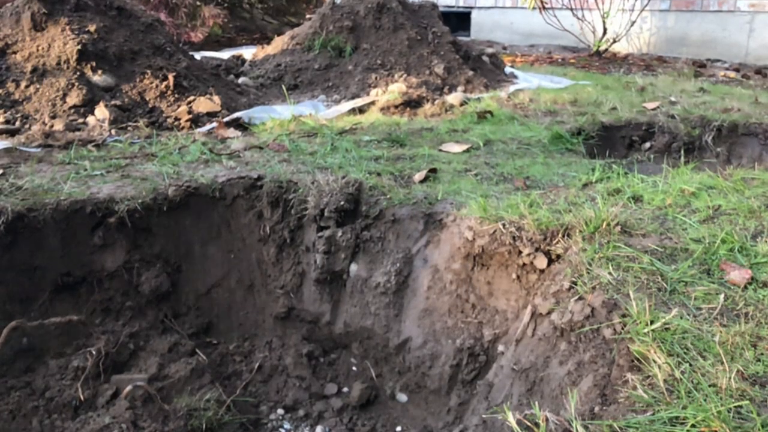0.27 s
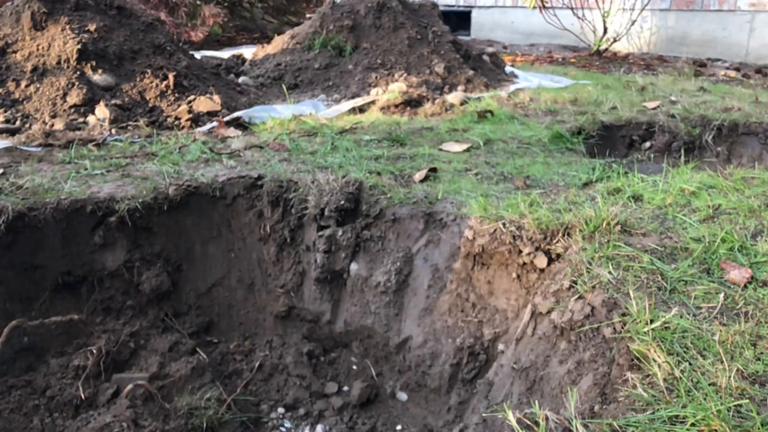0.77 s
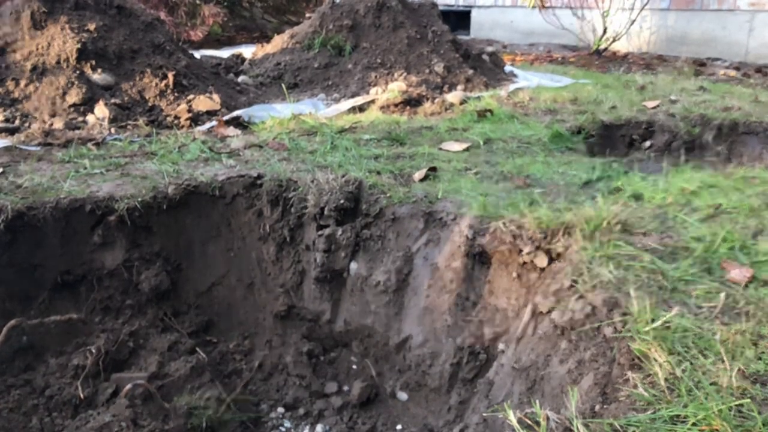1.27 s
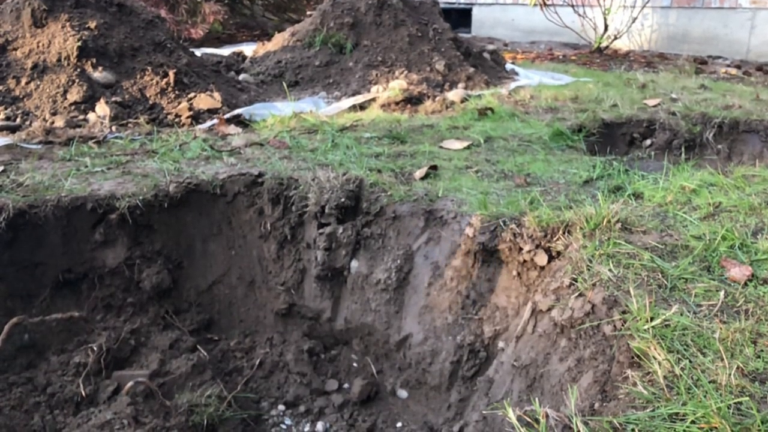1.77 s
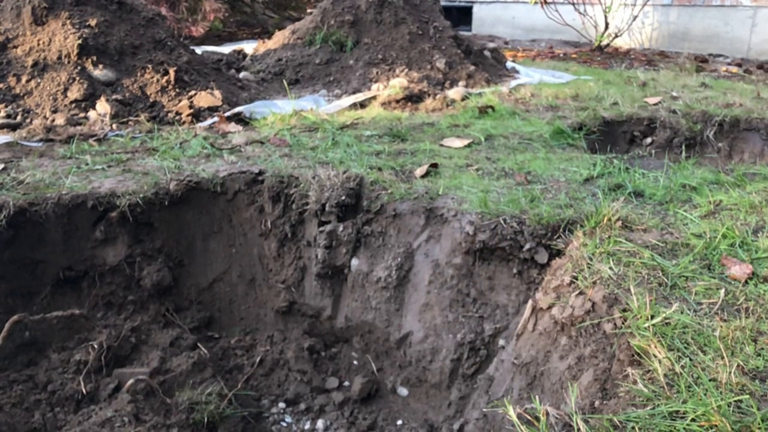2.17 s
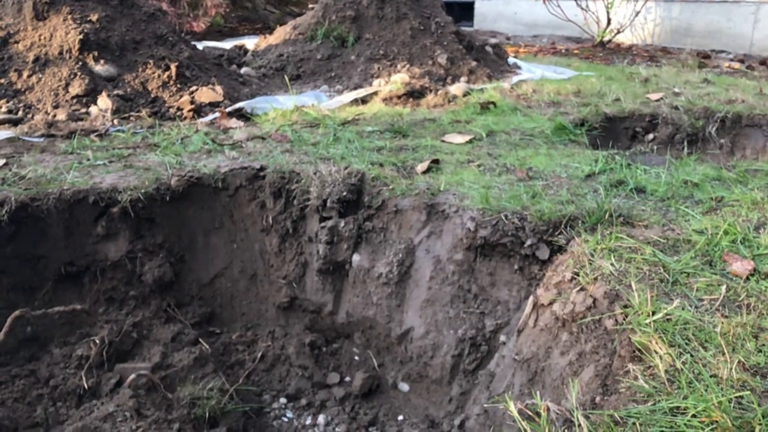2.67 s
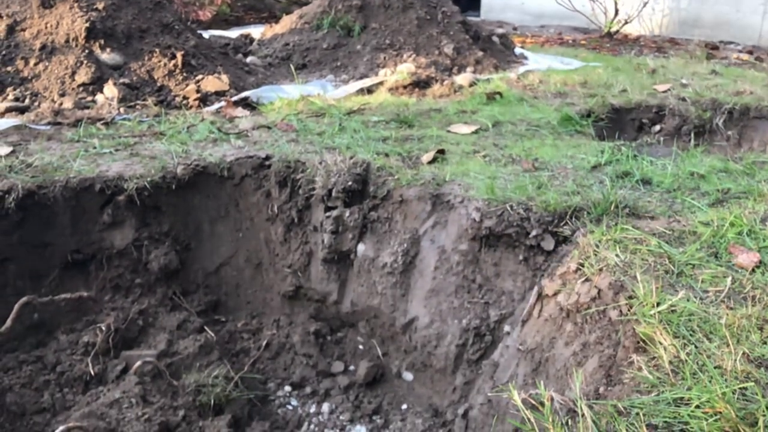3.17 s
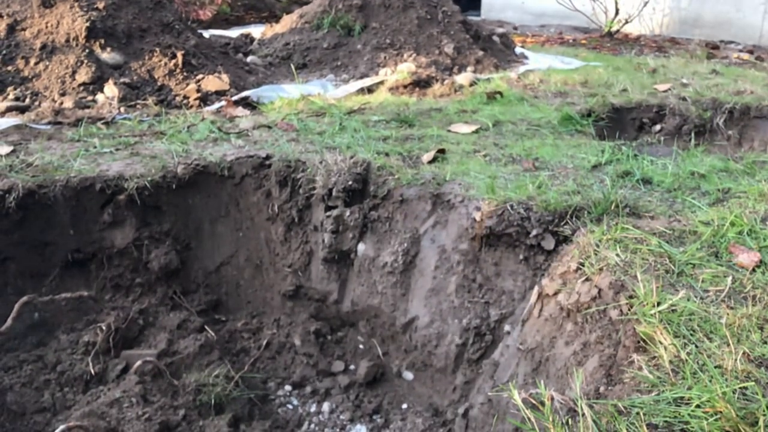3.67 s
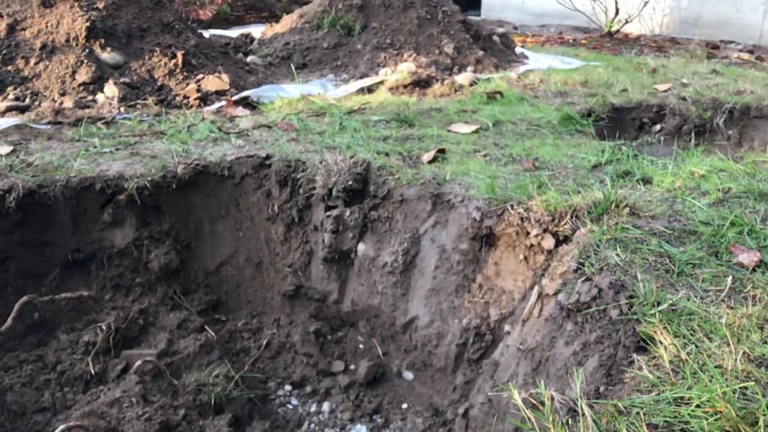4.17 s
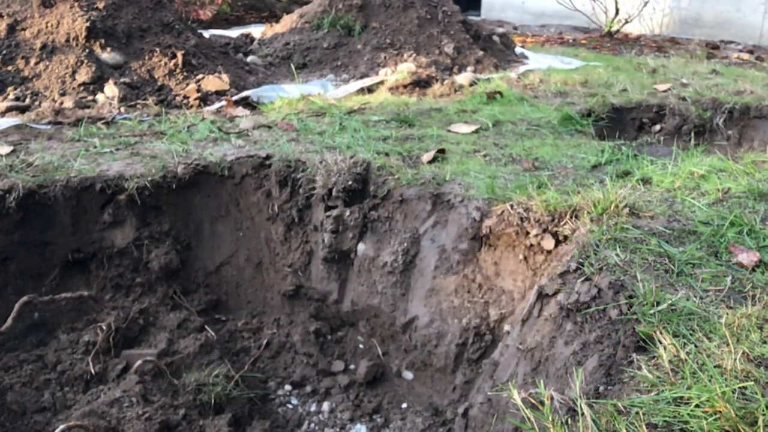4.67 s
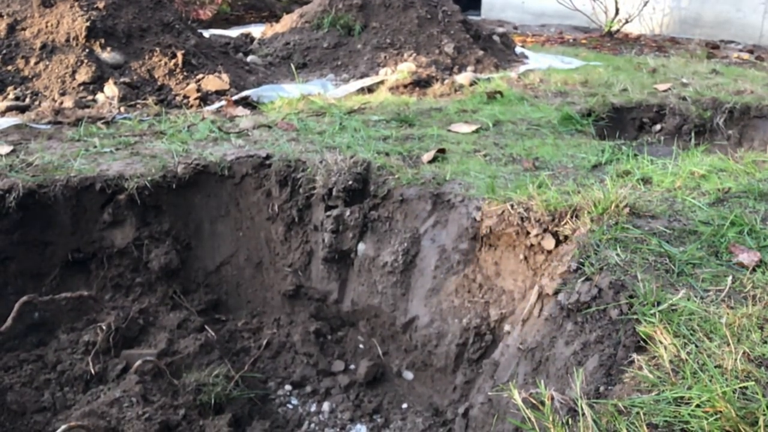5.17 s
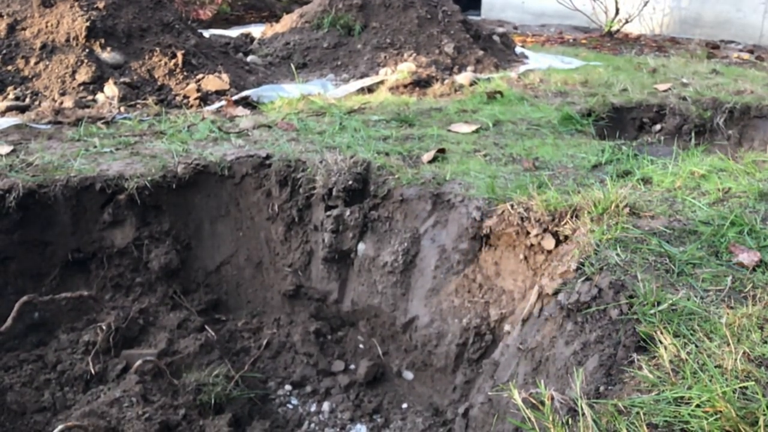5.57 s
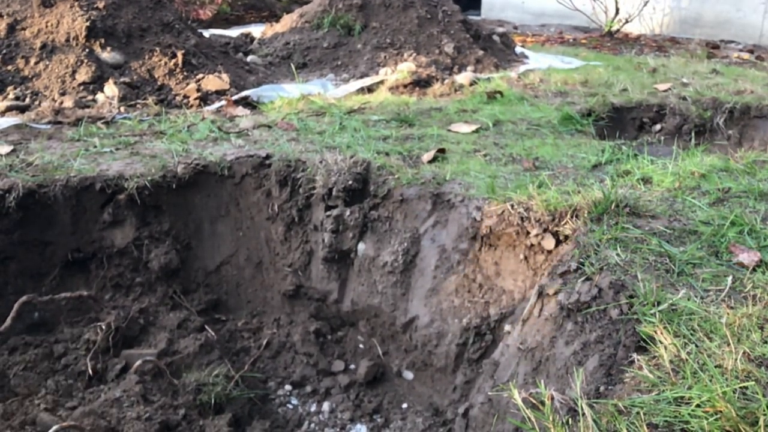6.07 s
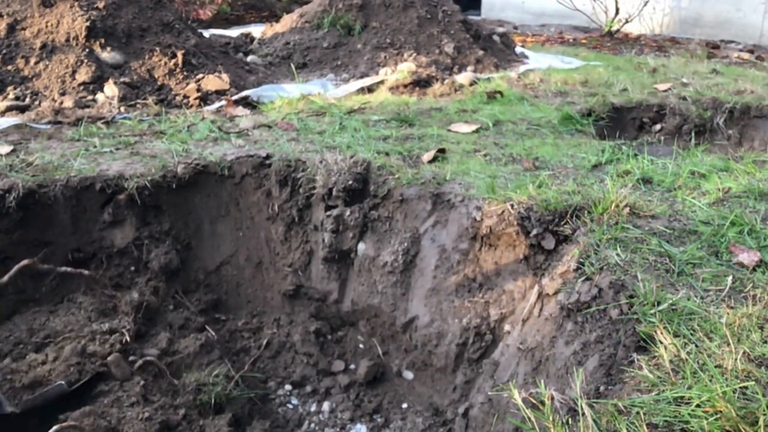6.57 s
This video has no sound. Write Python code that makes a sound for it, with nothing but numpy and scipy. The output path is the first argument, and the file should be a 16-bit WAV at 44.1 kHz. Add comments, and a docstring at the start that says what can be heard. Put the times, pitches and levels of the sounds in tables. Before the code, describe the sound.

A steel shovel chops four times into packed stony soil outdoors, gritty and close, then earth cracks, stones tick and loose dirt slides.

```python
"""A steel shovel chops into packed, stony soil at the edge of a pit in a yard, close to the microphone.
Four blows in the first half crush grit, ring the blade's modes and thud into the ground; scrapes and stone ticks
lie around them. Packed earth cracks and loose earth slides, mostly later, and a rubbery stick-slip squeak rises once.
Cloth and grass rustle faintly throughout as dry friction, pit and house walls return thin reflections,
and distant traffic rumbles underneath as low filtered noise."""
import sys
import numpy as np
from scipy import signal
from scipy.fft import rfft, irfft
from scipy.io import wavfile
from scipy.ndimage import uniform_filter1d

SR = 44100
rng = np.random.default_rng(int(sys.argv[2]) if len(sys.argv) > 2 else 0)


def file_out(sig):
    """Save sig as 16-bit WAV at sys.argv[1]."""
    # one column per channel
    cols = np.atleast_2d(sig).T
    # limit, then scale
    lim = np.clip(cols, -1, 1)
    pcm = np.round(lim * 32767).astype(np.int16)
    wavfile.write(sys.argv[1], SR, pcm)


N = 299880

# spectral outline of dull, loose or packed earth: f/Hz, level/dB
EARTH_OUTLINE = [(40, -29.5), (130, -3), (280, 6.5), (450, 1.5), (660, 6), (1200, -5), (2200, -11.5),
                 (8000, -17.5)]
# spectral outline of the shaken ground: f/Hz, level/dB
GROUND_OUTLINE = [(30, -33), (60, 3), (110, -6.5), (220, -10.5), (400, -21.5), (2000, -57)]
# spectral outline of dry friction on cloth and grass: f/Hz, level/dB
CLOTH_OUTLINE = [(200, -16), (1150, 1), (2200, -5), (3900, 1), (6500, -5), (8700, -7), (10400, -11),
                 (12000, -4.5), (16000, -15.5)]

CHOP_TILT_DB = 0.5  # brightness of entry and thud, dB per octave


def chops():
    """Overlapping impacts: a swing crunches in, grinds over a stone and thuds, in varying order; earth breaks loose."""
    # full swings into the pit wall: t/s, entry length/s, crunch level/dB, stone delay/s, stone length/s,
    # stone brightness/(dB per octave), blade ring level/dB, contact place (0 tip, 1 side),
    # thud delay/s, thud level/dB, thud f/Hz
    swings = [ (0.2367, 0.021, -12, .011, .037, 1.5, -6, 0.081, 0.037, -17.5, 1076),
              (1.2786, 0.0045, -11, .011, 0.0096, 4, -24.5, .1, 0.035, -10.5, 711),
              (2.4022, 0.012, -11, .004, .008, -3, -19.5, 0.99, 0.0012, -13, 650),
              (3.339, 0.012, -10.5, 0.03, 0.016, 0.5, -9, 0.85, .011, -7.5, 544)]
    # relative to the entry's crunch
    entry_ring_db, stone_db = -9.5, -0.5
    loose_earth_db, loose_grit_db, loose_rumble_db = -13.5, -23, -24.5
    # the shaft's knock is alike in every swing
    shaft_db, shaft_hz = -22, 269
    stone_knock_db, stone_knock_hz = -19, 383
    # crunch and ring are relative to the thud
    thud_s, thud_crunch_db, thud_ring_db = 0.011, -8, -18.5
    # earth breaks loose once the blade has passed the stone
    loose_lag_s, loose_s = .02, 0.032
    out = np.zeros(N)
    for s, entry, db, to_stone, on_stone, tilt, ring_db, place, to_thud, thud_db, thud_hz in swings:
        entry_blow = blow(entry, db, CHOP_TILT_DB, db + entry_ring_db, place, shaft_db, shaft_hz)
        add(out, s, entry_blow)
        stone_blow = blow(on_stone, db + stone_db, tilt, ring_db, place, stone_knock_db, stone_knock_hz)
        add(out, s + to_stone, stone_blow)
        thud_blow = blow(thud_s, thud_db + thud_crunch_db, CHOP_TILT_DB, thud_db + thud_ring_db,
                         place, thud_db, thud_hz)
        add(out, s + to_thud, thud_blow)
        loose_at = s + to_stone + on_stone + loose_lag_s
        grit_db = db + loose_grit_db
        add(out, *slide(loose_at, loose_s, loose_s, grit_db, grit_db,
                        db + loose_earth_db, db + loose_rumble_db))
    return out


def blow(bite, crunch_db, tilt, ring_db, place, thud_db, thud_hz, contact_db=3, ground_db=-20, ground_s=.035):
    """Impact excitation: one contact force drives crunch, blade and thud, and noise shakes the ground."""
    contact_hz = 5200  # soil cushions the contact, so higher modes ring less
    force = bite_force(bite)
    t = np.arange(len(force)) / SR
    crunch = crest(grind(force, place, tilt), crunch_db)
    # the first hard contact kicks all modes together; the grit then keeps stirring them
    kick = (t == 0) * np.linalg.norm(force) * undb(contact_db)
    jolt = signal.sosfilt(signal.butter(2, contact_hz, fs=SR, output="sos"), force + kick)
    ring = crest(blade(jolt, place, scatter_db=4), ring_db)
    body = crest(thud(force, thud_hz), thud_db)
    # the ground's shake dies away at its own rate
    tremor = rng.standard_normal(len(t)) * np.exp(-t / ground_s)
    shake = crest(colour(tremor, GROUND_OUTLINE), crunch_db + ground_db)
    return crunch + ring + body + shake


def bite_force(bite, release_s=0.0023, crumble_db=-20, crumble_s=0.038):
    """Granular crushing: the edge bites at once, crushes grit until it stops, and crumbs settle after it."""
    t = np.arange(SR // 3) / SR
    after = np.maximum(t - bite, 0)
    push = np.exp(-after / release_s) + undb(crumble_db) * np.exp(-after / crumble_s)
    return push * grit(t, grain_db=5.5, clump_db=1.0, clump_rate=570)


def grind(force, place, tilt):
    """Crushing noise: grit heard directly and through the blade, which the soil damps meanwhile."""
    # spectral outline of crushed grit: f/Hz, level/dB
    crunch_outline = [(60, -17.5), (300, -9), (900, 9.5), (1300, 4.5), (1600, 8.5), (1950, -2), (2400, 7.5),
                      (3800, 0), (5200, 3.5), (8500, -1.5), (10300, -9.5), (12000, -5.5), (16000, -14)]
    choked = blade(force, place, longest_t60=.03)
    return colour(unit(force) + undb(-3) * unit(choked), crunch_outline, tilt)


def blade(force, place, longest_t60=1, scatter_db=5.0, detune=.0018):
    """Modal synthesis: contact place weights damped modes; pressed soil shortens their ring."""
    # steel blade in soil, before scatter: f/Hz, level struck at tip/dB, level struck at side/dB, t60/s
    modes = [ (265, -10, -10, .11), (520, -5, -6, .07), (1098, 0, -11, .085), (1475, -4, -16, .16),
             (1610, -11, -10, .16), (2358, -3, -12, .08), (2805, -10, -13, .11), (3170, -3, -9, .07),
             (3314, -6, -2, .07), (3710, -7, -9, .1), (3855, -12, -4, .07), (4036, 2, -8, .095),
             (4158, -6, 1, .18), (4288, -9, -4, .15), (4865, -8, -3, .09), (5482, -11, -6, .08),
             (5898, -3, -14, .09), (6525, -8, -10, .08), (7940, -9, -5, .06), (8330, -6, -10, .07),
             (8880, -7, -6, .04), (9240, -11, -11, .04), (11950, -9, -9, .03)]
    t = np.arange(SR // 4, dtype=np.float32) / SR
    hz, tip_db, side_db, t60 = np.transpose(modes)
    strength, load, sign = rng.standard_normal((3, len(hz)))
    db = tip_db + np.clip(place, 0, 1) * (side_db - tip_db) + scatter_db * strength
    # clinging soil shifts each mode a little
    turn = np.float32(2 * np.pi * hz * (1 + detune * load))[:, None] * t
    decay = np.float32(-np.log(1000) / np.minimum(t60, longest_t60))
    fade = np.exp(decay[:, None] * t)
    response = np.float32(np.sign(sign) * undb(db)) @ (np.sin(turn) * fade)
    return convolve(force, response)


def thud(force, hz, spread_db=-3):
    """Damped resonance: shaft and packed earth give one short, low mode over a dull broad knock."""
    t, t60 = np.arange(SR // 10) / SR, .034
    knock = convolve(force, np.cos(2 * np.pi * hz * t) * undb(-60 * t / t60))
    knock = signal.sosfilt(signal.butter(2, 2 * hz, fs=SR, output="sos"), knock)
    return crest(knock, 0) + crest(colour(force, EARTH_OUTLINE), spread_db)


def taps():
    """Light impacts: stones tick against the blade as it is drawn back or set down."""
    # contacts of blade and stone: t/s, crunch level/dB, brightness/(dB per octave), blade ring level/dB
    ticks = [ (0.414, -42.5, 4, -55), (0.496, -40.5, 2.5, -46), (0.579, -30, 2.5, -46),
             (1.606, -29, .5, -54), (1.656, -20, 6, -59), (1.847, -45, 8, -35.5), (2.781, -24, 5.5, -34.5),
             (3.493, -37, 6, -32), (4.124, -47.5, 2, -43.5), (4.734, -17, -1.5, -47),
             (5.399, -29.5, 2, -51.5), (6.214, -48, 6, -80), (6.476, -21, -0.5, -41)]
    length_s, place = .006, 0.95
    thud_db, thud_hz = -15.5, 626  # level relative to the crunch
    out = np.zeros(N)
    for s, db, tilt, ring_db in ticks:
        add(out, s, blow(length_s, db, tilt, ring_db, place, db + thud_db, thud_hz))
    return out


def cracks():
    """Brittle fracture: packed earth cracks dully and knocks the shaft; the buried blade hardly rings."""
    # earth cracking against the buried blade: t/s, length/s, thud level/dB, thud f/Hz
    fractures = [ (1.658, 0.0042, -27, 490), (3.402, 0.015, -19.5, 493), (3.553, 0.011, -45, 1120),
                 (4.051, 0.028, -51, 784), (4.812, 0.0078, -32.5, 220), (4.913, 0.011, -21.5, 666),
                 (4.949, 0.0062, -30.5, 566), (4.964, 0.0096, -18, 620), (4.990, 0.0065, -9, 640),
                 (5.938, 0.023, -19, 580), (5.954, 0.007, -13.5, 690), (6.036, 0.0085, -18, 314),
                 (6.466, 0.0017, -20, 752)]
    # firmer earth cracks higher, with more crunch; crunch is relative to the thud
    firm_hz, firm_crunch_db, crunch_db_per_octave = 640, -4.5, 21
    tilt_db, place = -4.5, 0.29
    # ring and the shaft's knock are relative to the thud
    ring_db, shaft_db, shaft_hz = -47, -6.5, 322
    out = np.zeros(N)
    for s, length, db, hz in fractures:
        crunch_db = db + firm_crunch_db + crunch_db_per_octave * np.log2(hz / firm_hz)
        add(out, s, blow(length, crunch_db, tilt_db, db + ring_db, place, db, hz))
        add(out, s, crest(thud(bite_force(length), shaft_hz), db + shaft_db))
    return out


def scrapes():
    """Sliding friction: the blade grazes the pit wall on its way in and out."""
    # it rings more when free of the soil: t at the height/s, rise/s, fall/s,
    # grit level/dB, blade ring level/dB, ground rumble level/dB
    grazes = [ (0.186, 0.014, 0.056, -19, -24, -29), (0.571, 0.031, 0.046, -36.5, -45.5, -58),
              (1.262, 0.015, 0.04, -25.5, -31.5, -32), (1.628, 0.053, 0.1, -32.5, -41, -30.5),
              (1.761, 0.042, 0.029, -40, -43, -40.5), (2.692, 0.022, 0.017, -30.5, -36.5, -36.5),
              (2.763, 0.044, 0.03, -34.5, -44, -56), (3.338, 0.011, 0.07, -25, -29.5, -21.5),
              (4.885, 0.042, .05, -36.5, -41, -33), (5.939, 0.043, 0.027, -20.5, -34.5, -40),
              (6.487, 0.047, .02, -28.5, -52.5, -63)]
    dragged_earth_db = -9  # relative to the grit
    out = np.zeros(N)
    for s, rise, fall, db, ring_db, ground_db in grazes:
        add(out, *slide(s, rise, fall, db, ring_db, db + dragged_earth_db, ground_db))
    return out


def slide(s, rise, fall, grit_db, ring_db, earth_db, ground_db, place=0.71, stone_db=-4):
    """Granular friction: sand and stones catch on the blade as loose earth tumbles; gives (start s, sound)."""
    t = np.arange(SR // 2) / SR
    start = max(s - t.mean(), 0)
    pressure = swell(start + t - s, rise, fall)
    grains = grit(t, grain_db=11, clump_db=5, clump_rate=350)
    force = pressure * (grains + undb(stone_db) * stones(t, rate=200))
    sand = crest(grind(force, place, tilt=1.0), grit_db)
    ring = crest(blade(force, place), ring_db)
    earth = crest(colour(force, EARTH_OUTLINE), earth_db)
    rumble = crest(colour(force, GROUND_OUTLINE), ground_db)
    return start, sand + ring + earth + rumble


def spills():
    """Granular flow: earth slides off the blade, and crumbs trickle into the grass from its height on."""
    # loose earth sliding: t at the height/s, half length/s, level/dB
    slips = [ (1.719, 0.013, -30), (3.482, 0.015, -32.5), (4.75, .015, -27.5), (5.1, 0.019, -40.5),
             (5.379, 0.052, -42), (5.453, .024, -37), (5.734, 0.035, -40), (5.837, 0.03, -34.5),
             (6.004, 0.036, -30), (6.062, 0.022, -35.5), (6.108, 0.021, -34)]
    trickle_db, trickle_s = -16.5, 0.12  # level relative to the spill, decay time
    out, t = np.zeros(N), np.arange(SR) / SR
    for s, length, db in slips:
        add(out, *spill(s, length, db))
        crumbs = stones(t, rate=450) * np.exp(-t / trickle_s)
        add(out, s, crest(colour(crumbs, CLOTH_OUTLINE), db + trickle_db))
    return out


def spill(s, length, db):
    """Granular friction led by loose earth, with a little grit, ring and rumble; gives (start s, sound)."""
    grit_db, ring_db, rumble_db = -4, -17.5, -7.5  # relative to the earth
    return slide(s, length, length, db + grit_db, db + ring_db, db, db + rumble_db)


def squeak(overtones_db=(0, -1, -10, -15)):
    """Stick-slip oscillation: a rubbery squeak, as of a boot on the blade's step, rises to the push's height."""
    at_s, rise_s, fall_s, level_db = 5.212, 0.047, 0.031, -40
    top_hz, octaves_per_s = 1200, 5.5
    out, t = np.zeros(N), np.arange(SR // 4) / SR
    lag = t - t.mean()
    pitch_hz = top_hz * 2 ** (octaves_per_s * np.minimum(lag, 0))
    phase = rub_phase(t, pitch_hz, rough=.09)
    tone = sum(undb(db) * np.sin(k * phase) for k, db in enumerate(overtones_db, 1))
    uneven_tone = unit(tone * undb(3.4 * walk(t, 239)))
    hiss = unit(colour(rng.standard_normal(len(t)), CLOTH_OUTLINE))
    rasp = uneven_tone + undb(-7.5) * hiss
    add(out, at_s - t.mean(), crest(rasp * swell(lag, rise_s, fall_s), level_db))
    return out


def rustle(rest_db=-70):
    """Dry friction of cloth and grass; the passing rate of the cloth's ribs sets a pitch that rises with speed."""
    # brushes as the digger moves: t at the height/s, half length/s, level/dB
    brushes = [ (0.024, 0.013, -49), (0.974, 0.063, -55.5), (1.133, 0.055, -62.5), (2.038, 0.045, -44),
               (2.203, .03, -59.5), (3.007, 0.045, -51.5), (3.158, .03, -57.5), (3.712, 0.15, -56.5),
               (3.804, .02, -46), (4.093, 0.093, -52), (4.338, 0.09, -49), (4.533, 0.06, -56.5),
               (4.708, 0.046, -49.5), (5.525, 0.054, -55.5), (6.342, 0.034, -58)]
    rib_hz, rib_db = 3770, -4.5  # pitch at full speed, level factor on the ribs' sine
    t = np.arange(N) / SR
    rubbing = grit(t, grain_db=6.5, clump_db=3.5, clump_rate=90)
    fibres = unit(colour(rubbing + undb(-7.5) * stones(t, rate=90), CLOTH_OUTLINE))
    out, t_swish = undb(rest_db) * fibres, t[:SR // 2]
    for s, length, db in brushes:
        start = max(s - t_swish.mean(), 0)
        speed = swell(start + t_swish - s, length, length)
        ribs = np.sin(rub_phase(t_swish, rib_hz * speed ** .25, rough=.15))
        brushed = fibres[int(start * SR):][:len(speed)]
        add(out, start, undb(db) * speed * (brushed + undb(rib_db) * ribs))
    return out


def yard(x, pit_db=-17, pit_t60=0.11, walls_db=-34):
    """Reverberation as decaying noise: quick reflections in the pit, then a thin tail from the house walls."""
    t = np.arange(SR) / SR
    pit, walls = rng.standard_normal((2, SR))
    walls_t60 = .8
    pit = pit * undb(-60 * t / pit_t60) * (t > .004)
    walls_outline = [(100, -16), (1600, 5.0), (4500, 3.5), (12000, -0.5)]  # f/Hz, level/dB
    walls = colour(walls * undb(-60 * t / walls_t60) * (t > .02), walls_outline)
    pit_part = undb(pit_db) * pit / np.linalg.norm(pit)
    walls_part = undb(walls_db) * walls / np.linalg.norm(walls)
    return convolve(x, pit_part + walls_part)


def town(level_db=-48.0):
    """Filtered noise: distant traffic rumbles low, its level wandering slightly."""
    # spectral outline of distant traffic: f/Hz, level/dB
    town_outline = [(20, -40.5), (40, -14), (62, 0.5), (90, -2), (150, -7.5), (280, -15.5), (500, -22.5),
                    (1000, -19), (1600, -27.5), (2100, -37.5), (4000, -39.5), (9000, -42.5)]
    wander = walk(np.arange(N) / SR, 2)
    rumble = unit(colour(rng.standard_normal(N), town_outline))
    return rumble * undb(level_db + wander / 2)


def grit(t, grain_db, clump_db, clump_rate):
    """Granular noise: dense clicks of uneven size that bunch as the grains stick and give way."""
    sizes = undb(grain_db * np.clip(rng.standard_normal(len(t)), -2, 2))
    clumps = undb(clump_db * walk(t, clump_rate))
    return unit(rng.standard_normal(len(t)) * sizes * clumps)


def stones(t, rate, size_db=5):
    """Random impulses: lone ticks of small stones, a few much larger than the rest."""
    hit = rng.random(len(t)) < rate / SR
    sizes = undb(size_db * np.minimum(rng.exponential(size=len(t)), 2))
    # the tiny offset keeps a stretch without ticks from dividing by zero
    return unit(hit * sizes * np.sign(rng.standard_normal(len(t))) + 1e-9)


def rub_phase(t, hz, rough):
    """Frequency modulation: phase of a stick-slip tone whose pitch flutters."""
    return 2 * np.pi * np.cumsum(hz * (1 + rough * walk(t, 900))) / SR


def swell(lag, rise, fall):
    """Gaussian envelope: smooth rise to 1 at lag 0 and fall after it."""
    return np.exp(-(lag / np.where(lag < 0, rise, fall)) ** 2)


def walk(t, rate):
    """Linear interpolation of random levels, `rate` of them a second."""
    knots = rng.standard_normal(size=2048)
    return np.interp(t * rate, np.arange(len(knots)), knots)


def colour(x, points, tilt=0, size=4096):
    """Minimum-phase filter with a (f/Hz, level/dB) outline, tilted by some dB per octave above 1024 Hz."""
    hz, db = np.transpose(points)
    octave = np.log2(np.maximum(np.fft.rfftfreq(size, 1 / SR), 10))
    gain_db = np.interp(octave, np.log2(hz), db) + tilt * np.maximum(octave - 10, 0)
    # folding the cepstrum forward makes the response causal
    cepstrum = irfft(np.log(undb(gain_db)))
    cepstrum[1:size // 2] *= 2
    cepstrum[size // 2 + 1:] = 0
    return convolve(x, irfft(np.exp(rfft(cepstrum))))


def convolve(x, response):
    """Linear system: pass x through an impulse response, keeping its length."""
    return signal.fftconvolve(x, response)[:len(x)]


def undb(db):
    """Logarithmic level: decibels to amplitude gain."""
    return 10 ** (np.asarray(db) / 20)


def unit(x):
    """Energy normalisation: scale to rms 1."""
    return x / np.sqrt(np.mean(x ** 2))


def crest(x, db):
    """Short-time level: scale so that the loudest 10 ms have this rms level."""
    power = uniform_filter1d(x ** 2, SR // 100, mode="constant")
    return x * undb(db) / np.sqrt(power.max())


def add(out, s, x):
    """Superposition: mix x into out from time s on."""
    start = int(s * SR)
    out[start:start + len(x)] += x[:len(out) - start]


def scene():
    """Superposition of the shovel and the digger, their reflections in the yard, and the town."""
    digging = chops() + taps() + cracks() + scrapes() + spills() + rustle() + squeak()
    return (digging + yard(digging) + town())[None]


def record(dry):
    """Soft saturation and low-pass: the microphone rounds off the hardest blows; the top is cut."""
    top_hz = 15900
    rounded = dry / (1 + (dry / .88) ** 4) ** (1 / 4)
    return signal.sosfilt(signal.ellip(10, .2, 70, top_hz, fs=SR, output="sos"), rounded)


dry = scene()
out = record(dry)
file_out(out)
```